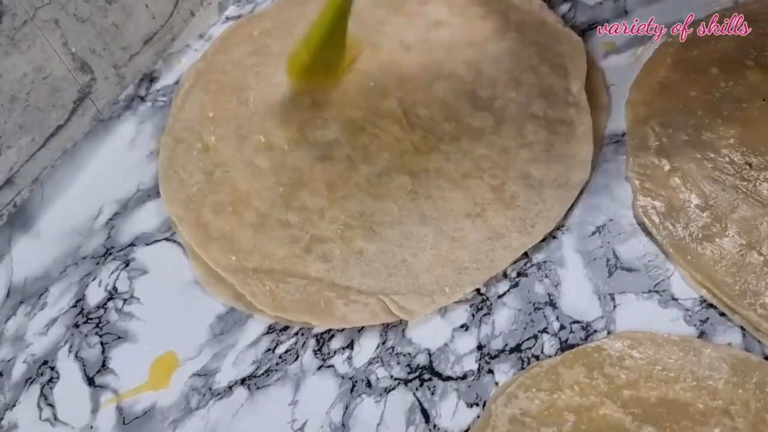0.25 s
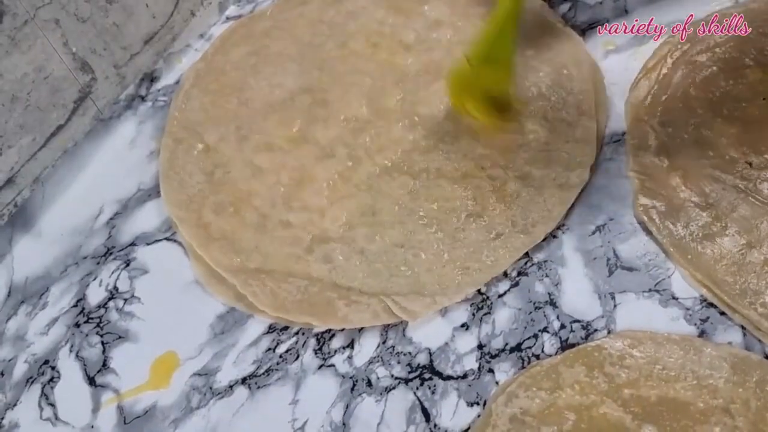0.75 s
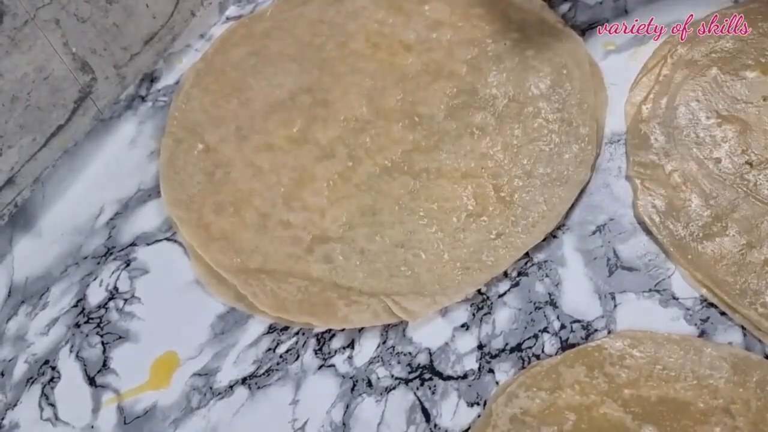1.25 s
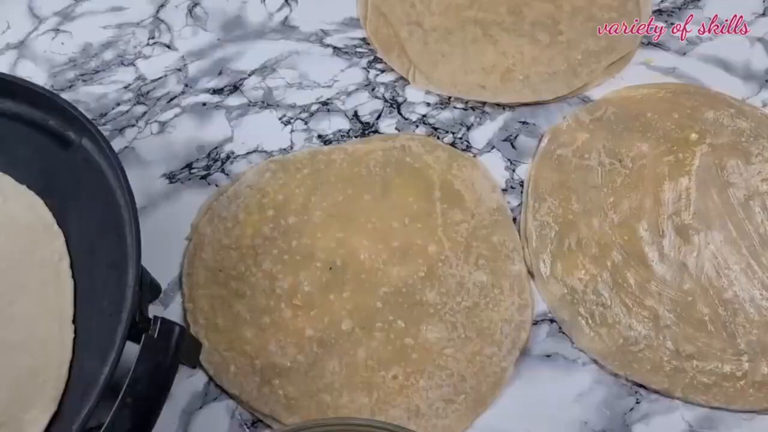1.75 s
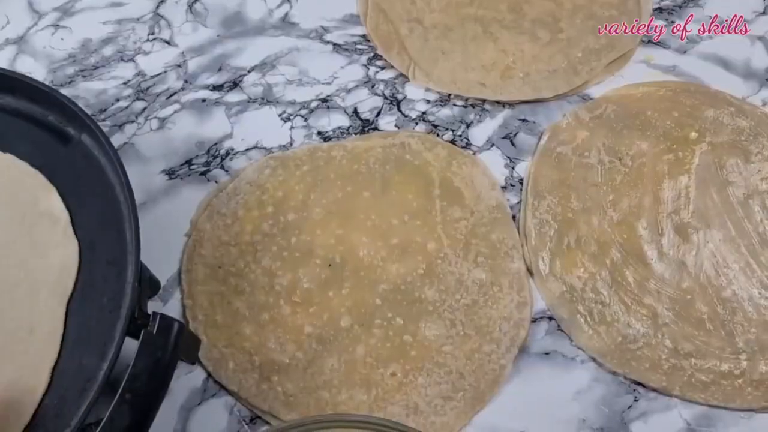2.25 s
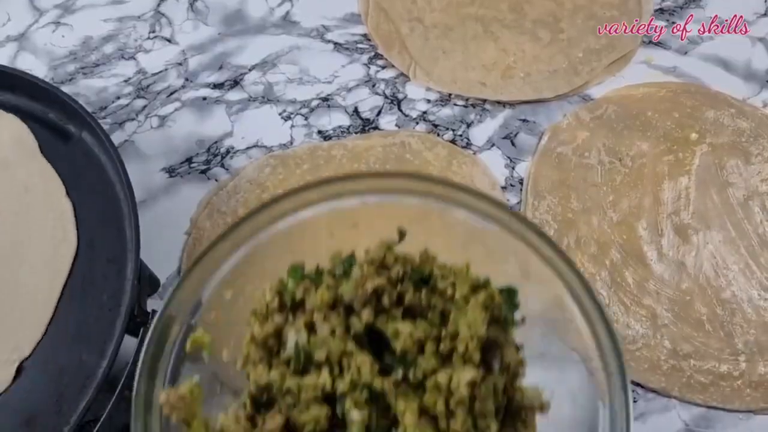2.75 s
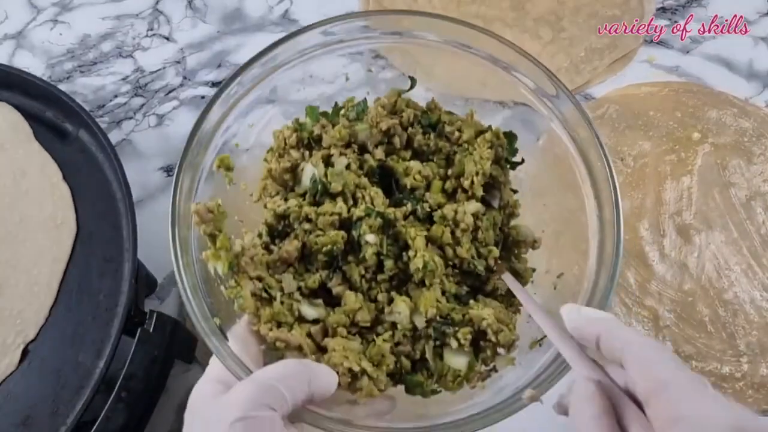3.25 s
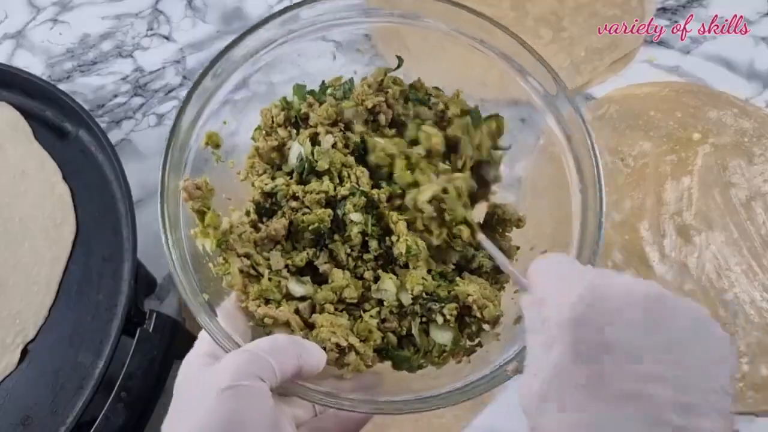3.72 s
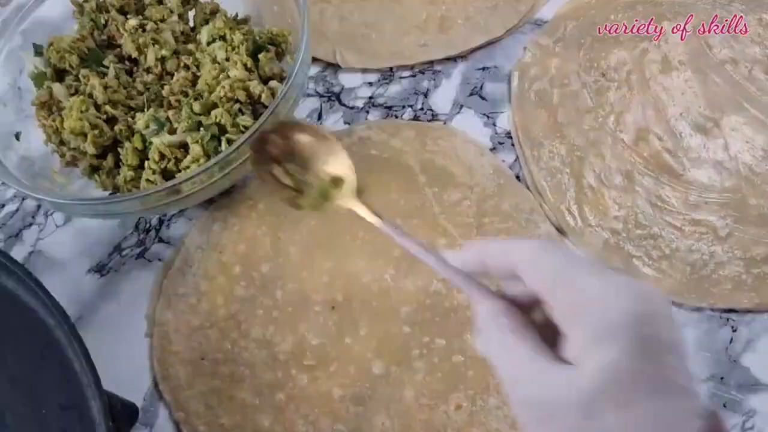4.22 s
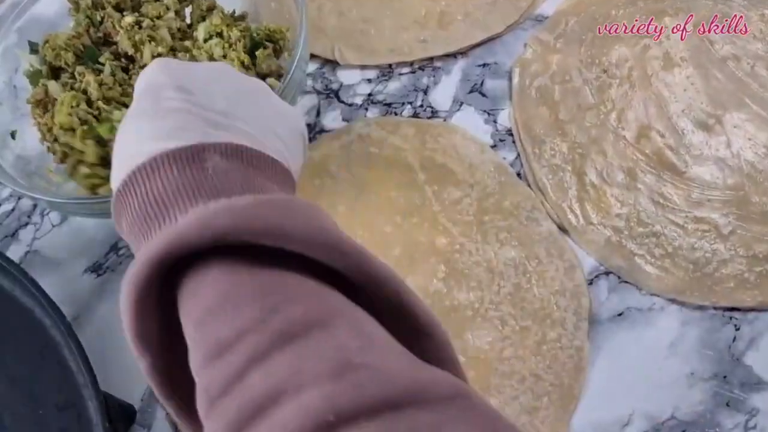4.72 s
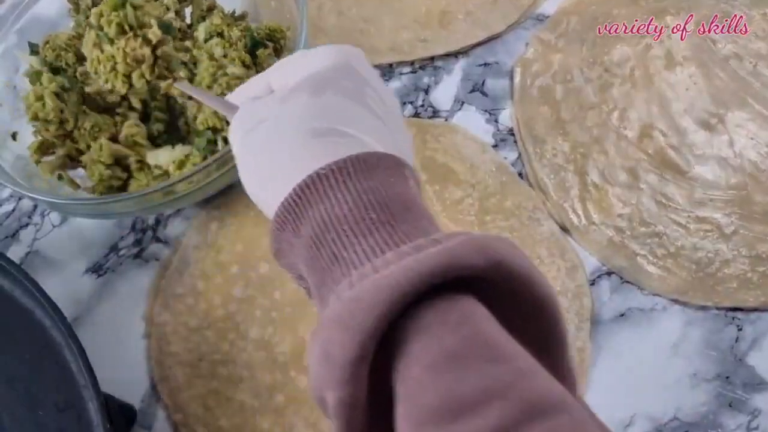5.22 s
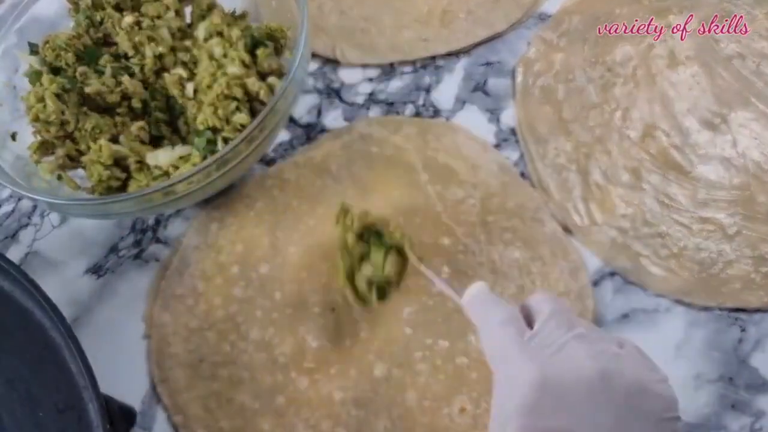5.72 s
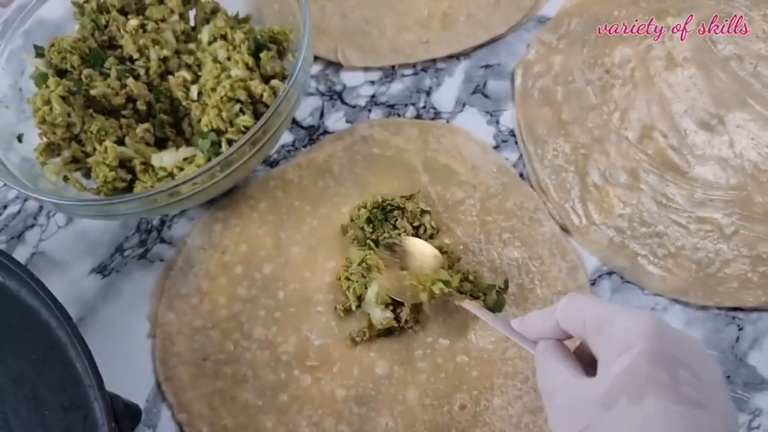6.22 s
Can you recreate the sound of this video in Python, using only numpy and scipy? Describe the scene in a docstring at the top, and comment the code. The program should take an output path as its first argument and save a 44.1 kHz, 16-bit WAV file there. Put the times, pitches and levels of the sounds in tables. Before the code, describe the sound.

In a small kitchen, a brush swishes, glass cracks against a worktop, a bowl is set down, and a spoon clanks and scrapes.

```python
"""A small hard kitchen heard close by two spaced microphones, with a faint hum and hiss behind everything.
First a soft brush oils dough, as friction hiss over a low murmur; then a small glass dish clinks on a stone
worktop, a crack and dying modes that break off at once. A bowl slides over and is set down with dull knocks.
A spoon taps it, faint crumbs tick, and the spoon clanks and scrapes, its grit ringing the damped bowl.
Hands and sleeves rustle throughout, as quiet friction hiss."""
import sys
import numpy as np
from scipy import signal
from scipy.fft import rfft, irfft
from scipy.io import wavfile
from scipy.ndimage import uniform_filter1d

SR = 44100
rng = np.random.default_rng(int(sys.argv[2]) if len(sys.argv) > 2 else 0)


def generate_wav(signal):
    """Clip the signal to [-1, 1] and save it as 16-bit WAV at the path in sys.argv[1]."""
    frames = np.transpose(np.atleast_2d(signal))
    scaled = np.clip(frames, -1, 1) * 32767
    pcm = np.round(scaled).astype(np.int16)
    wavfile.write(sys.argv[1], SR, pcm)


N = 285327

# Colour of the room's hiss. Each row: frequency in Hz, relative level in dB per Hz.
AIR_COLOUR = [(110, -38), (190, -11.5), (224, -11), (306, 0), (583, -9), (1820, -14.5), (7110, -23.5),
              (10700, -35.5), (15400, -19.5)]
AIR_DB = -66.5  # rms level of the hiss
# Low rumble of the room. Each row: centre in Hz, width in Hz, relative level in dB.
RUMBLE_BANDS = [(59.8, 22, -72), (118, 40, -67.5), (425.5, 810, -72)]
# Swell of the rumble. Each row: time in seconds, level in dB.
RUMBLE_SWELL = [(0, -66), (.7, -62), (1.5, -58.5), (1.899, -66), (3.3, -68.5), (4.2, -66), (5.2, -59.5),
                (6.47, -67)]
# Appliance tones. Each row: frequency in Hz, peak in dB, rms waver in Hz.
MOTOR_TONES = [(95, -66, 7), (158.4, -67.5, 0.35)]
# Likeness of the two microphones in diffuse sound. Each row: frequency in Hz, correlation from -1 to 1.
MIC_LIKENESS = [(60, 0.68), (190, 0.78), (350, -0.044), (600, -0.25), (1400, -0.48), (3000, -0.022)]
# Echo of the room. Each row: frequency in Hz, time to fall 60 dB in seconds.
KITCHEN_DECAY = [(100, 0.14), (500, 0.34), (2000, 0.28), (6000, 0.26), (14000, 0.23)]
EDGE_HZ = 15700  # upper band limit of the microphones

# Rubbing strokes. Each row: full strength at seconds, held for seconds, level in dB, treble added in dB.
BRUSH_STROKES = [(0, 0.039, -46, 3), (0.163, 0.017, -47.5, 2), (.245, 0.01, -38.5, 2),
                 (0.347, 0.019, -40, 1), (.51, 0.075, -51.5, 0), (0.618, .08, -45, 1)]
BOWL_SLIDES = [(1.91, 0.31, -47, 0.0045), (2.39, 0.22, -55.5, 0.0033)]
SPOON_SCRAPES = [(4.515, 0.12, -48, 5), (5.08, 0.17, -43, 0), (5.28, 0.26, -57, 8),
                 (5.99, 0.016, -59.5, 10), (6.412, .07, -54.5, 0)]
# Speed of each kind of stroke: rise, sag while held and release, all in dB per second.
BRUSH_MOVE = (320, 7.9, 280)
SLIDE_MOVE = (130, 16.4, 110)
SCRAPE_MOVE = (2600, 5.1, 184)
# Rustle of hands and sleeves. Each row: time in seconds, level in dB.
RUSTLE_LEVEL = [(0, -63.5), (.8, -69.5), (1.0, -61), (1.62, -65), (1.83, -77.5), (2.95, -69.5), (3.44, -73),
                (3.5, -63), (3.65, -66.5), (3.79, -67), (4.03, -70.5), (4.15, -60.5), (4.28, -69),
                (4.36, -60.5), (4.5, -67.5), (5.63, -66), (6.05, -68), (6.17, -88), (6.3, -69.5)]
# Colour of each rubbing. Each row: frequency in Hz, relative level in dB per Hz.
BRUSH_COLOUR = [(120, -49), (400, -19), (955, -17.5), (1710, -3.5), (2500, -6.5), (15400, -17)]
SLIDE_COLOUR = [(710, -46), (1200, -14.5), (1470, -10.5), (1710, -6), (1820, -9.5), (4010, -1.5),
                (15400, -12.5)]
SCRAPE_COLOUR = [(60, -34), (100, -11), (300, -12.5), (460, -12), (800, -16.5), (2600, -19.5), (7000, -25),
                 (10000, -37.5), (13000, -28.5), (15400, -34.5)]
RUSTLE_COLOUR = [(290, -25.5), (500, 1.5), (769, -5), (1440, -7), (1900, -7), (2920, -13), (15400, -21.5)]
# Tones murmuring under the brushed dough. Each row: frequency in Hz, relative level in dB, 60 dB decay in s.
DOUGH_MODES = [(127.4, 1, .2), (264, -9, 0.11), (509.6, -5.5, 0.13)]
MURMUR_DB = -12.5  # against the stroke
GRIT_DB, GRITS_PER_S = -13, 320  # level against the scraping stroke, mean rate of grains

# Dull knocks into the worktop. Each row: start in seconds, peak in dB, centre in Hz, spread in octaves.
KNOCKS = [(0.744, -37.5, 463, 1.25), (1.393, -51.5, 178, 0.65), (1.631, -23, 155, 0.68),
          (1.632, -15.5, 770, 0.76), (1.682, -18, 834, 1.3), (1.829, -46.5, 94, 0.59),
          (2.092, -48.5, 226, 1.47), (2.871, -49.5, 71, 0.69), (2.971, -29.5, 98, 1.6),
          (2.997, -32, 94.3, 1.24), (3.089, -42, 131.4, 0.92), (4.179, -46.5, 423, 0.26),
          (4.575, -25.5, 327, 0.77), (4.669, -31, 133, 1.6), (4.75, -33.5, 123, 0.57),
          (4.776, -28.5, 354.2, 0.35), (5.144, -32, 274.1, 0.97), (5.216, -23, 262, 0.94),
          (5.242, -24, 251, 1.76), (5.269, -42, 129, 1.5), (5.632, -28, 114.4, 0.82),
          (5.672, -32.5, 91.5, 1.1)]
# Modes of the worktop. Each row: frequency in Hz, relative level in dB, 60 dB decay in seconds.
WORKTOP_MODES = [(71, 6, 0.086), (93, 5.5, 0.21), (129, 3.5, 0.27), (180, -2, 0.17), (238.5, 1.5, .1),
                 (302, 2.5, 0.091), (425, 0.5, 0.12), (474, -3.5, 0.22), (512.5, 2, .12),
                 (600.7, -3.5, 0.078), (763.2, -1, 0.17), (823, 1, 0.18), (849.5, -1.5, 0.098),
                 (1005, -6, 0.19)]
# Small ticks of crumbs, bristles and spoon. Each row: time in seconds, peak in dB, centre in Hz, width in octaves.
TICKS = [(0.4995, -38.5, 1470, 0.4), (1.001, -33, 13900, 0.38), (1.0055, -31.5, 9000, 2.1),
         (1.066, -35.5, 3400, 0.18), (1.4117, -48.5, 7670, 1.8), (3.4999, -37, 1760, 1.16),
         (3.5175, -40.5, 1520, 1.6), (3.579, -44.5, 3750, 1.2), (3.6954, -42.5, 2300, 2.8),
         (3.8065, -28.5, 3640, 0.48), (3.808, -43, 990, 0.93), (4.114, -48, 11410, 1.4),
         (4.1443, -57, 12200, 1.9), (4.2552, -54, 8600, 0.99), (4.3291, -50.5, 6680, 1.16),
         (4.9096, -49, 5000, 1.5), (5.219, -25, 846, 0.57), (5.6346, -41.5, 1428, 0.54),
         (5.9835, -37.5, 1700, 0.95), (5.9933, -42, 12400, 1.44), (6.054, -53, 1740, 0.46),
         (6.103, -52, 10600, 1.02), (6.2458, -51.5, 4400, 0.68), (6.3207, -47.5, 12800, 2.3)]
# While the spoon digs, crumbs tick at chance moments: from seconds, to seconds.
STIRRING = (3.45, 4.45)
CRUMB_DB, CRUMB_SPREAD_DB = -54, 3  # mean peak, and the most it strays either way

# Blows on glass. Each row: time in seconds, crack peak in dB, tilt in dB per octave, ring against crack in dB,
# left minus right in dB, dB added to one clear mode.
DISH_BLOWS = [(1.6288, -7, 2.4, 3.5, -1.5, 0), (1.6825, -14.5, -4, -8.5, 8, -28)]
SPOON_TAPS = [(3.1406, -16, 0.45, -22, 0.46, 2.5), (3.2886, -41.5, -2.1, -11.5, -1.1, 3.5),
              (3.3512, -34, -1.5, -15, -0.35, 8), (4.7495, -14, 0.31, -16, 1.23, -9.5)]
RIM_BLOWS = [(4.5758, -12.5, 0, -13, 1.6, 0), (4.5952, -30.5, 0, -6, 0.67, 0)]
# Colour of the crack. Each row: frequency in Hz, relative level in dB per Hz.
CRACK_COLOUR = [(200, -26.5), (500, -9), (1500, -4), (3800, -4.5), (6500, -5.5), (10000, -19), (15500, -30)]
# Mode frequencies of each glass body, in Hz.
DISH_HZ = [132, 1862, 2729, 4011, 4039, 4924, 4981, 6971, 8554, 9249, 10770, 12650, 13810]
BOWL_HZ = [590, 1230, 1400, 2261, 3058, 3451, 3494, 3903, 4867, 6438, 7208, 8070, 11890, 13930]
RIM_HZ = [1330, 1916, 2885, 3844, 4450, 4560, 4936, 5862, 7074, 8500, 9502, 11200, 13500]
# The same modes in order. Each row: relative level in dB, 60 dB decay in seconds.
DISH_MODES = [(-20, 0.18), (-6.5, 0.3), (-21, .3), (-18, 0.11), (-9, 0.21), (-13, 0.097), (-14.5, .12),
              (-27, 0.21), (-34.5, 0.062), (-37.5, 0.14), (-31, 0.11), (-38, .1), (-34, 0.046)]
BOWL_MODES = [(-1, 0.048), (-7, 0.081), (3, 0.027), (-7.5, 0.19), (4.5, 0.037), (2.5, 0.26), (0, 0.076),
              (-14, 0.054), (-1.5, 0.093), (-4.5, 0.093), (-1, 0.067), (-17, 0.13), (-17, 0.22),
              (-11, 0.048)]
RIM_MODES = [(8.5, 0.012), (-2, 0.079), (-10, 0.061), (-4, 0.057), (-7.5, 0.31), (-2, 0.12), (0.5, 0.049),
             (11, 0.017), (-24, 0.031), (-12, 0.1), (-9.5, 0.065), (-4.5, 0.021), (-11, 0.044)]
DISH_STOPS_S = 1.829  # the dish's ring and its echo break off


def gain_of(db):
    """Decibels to a factor."""
    return 10 ** (np.asarray(db) / 20)


def evened(x):
    """Scales to rms 1."""
    return x / np.sqrt(np.mean(x ** 2) + 1e-20)


def read(points, hz):
    """Reads a (Hz, value) table on a log frequency axis."""
    f, value = np.transpose(points)
    return np.interp(np.log(hz + 1), np.log(f + 1), value)


def add(mix, s, sound):
    """Mixes a two-channel sound in at s seconds."""
    part = mix[:, round(s * SR):][:, :sound.shape[1]]
    part += sound[:, :part.shape[1]]


def pan(db):
    """Gains of the two channels for a left-right difference."""
    return gain_of([[db / 2], [-db / 2]])


def alike(left, other, hz):
    """Left and right spectra, correlated at each frequency as far as the spaced microphones agree."""
    same = np.clip(read(MIC_LIKENESS, hz), -1, 1)
    return np.array([left, same * left + np.sqrt(1 - same ** 2) * other])


def noise(field, size, patchy_db):
    """Stereo noise whose short-time magnitude is field(hz, t), with drifting patches."""
    hz = np.fft.rfftfreq(size, 1 / SR)[:, None]
    t = np.arange(4 * N // size + 5) * size / 4 / SR
    a, b, c, d, patches = rng.standard_normal((len(t), len(hz), 5)).T
    patches = uniform_filter1d(patches, size // 64, 0)
    patches = evened(uniform_filter1d(patches, 8192 // size, 1))
    z = alike(a + 1j * b, c + 1j * d, hz) * field(hz, t) * gain_of(patchy_db * patches)
    return signal.istft(z, nperseg=size, noverlap=3 * size // 4)[1][:, :N]


def ring(hz, modes, extra_db, lag_ms, blur):
    """Dying sines, later at the right microphone by lag_ms; each mode is three close ones, blur apart, that beat."""
    t, out = np.arange(SR // 3) / SR, 0
    for f, (db, t60), more_db in zip(hz, modes, extra_db):
        detunings = blur * rng.uniform(-1, 1, 3)
        close = sum(np.sin(2 * np.pi * f * (1 + off) * t) for off in detunings) / 3
        out = out + gain_of(db + more_db - 60 * t / t60) * close
    lag = round(lag_ms * SR / 1000)
    early, late = max(-lag, 0), max(lag, 0)
    out = out * (1 - np.exp(-t / 0.00043))  # the ring takes a moment to spread through the body
    return np.array([np.pad(out, (early, late)), np.pad(out, (late, early))])


def driven(push, body):
    """A body kept ringing by a continuous push."""
    return signal.oaconvolve(push[None], body / np.linalg.norm(body[0]), axes=1)[:, :N]


def burst(colour_db, ms):
    """A few milliseconds of dying noise with the colour colour_db(hz), peak 1."""
    t = np.arange(4096) / SR
    after = t - .002  # the burst is strongest 2 ms in
    envelope = np.exp(-np.abs(after) / np.where(after < 0, .0003, ms / 1000))
    one, other = rng.standard_normal((2, len(t))) * envelope
    right = 0.51 * np.roll(one, rng.integers(-20, 20)) + 1.2 * other
    z = rfft(np.array([one, right]))
    sound = irfft(z * gain_of(colour_db(np.fft.rfftfreq(len(t), 1 / SR) + 1)))
    return sound / np.abs(sound).max()


def kitchen(x, wet_db):
    """Adds the echo: sparse taps of random sign, each band dying at its own speed, other taps per microphone."""
    taps = np.zeros((2, SR // 2))
    at = np.arange(120, SR // 2 - 20, 20) + rng.integers(0, 20, (2, (SR // 2 - 121) // 20))
    np.put_along_axis(taps, at, rng.choice([-1., 1.], at.shape), 1)
    hz, t, z = signal.stft(taps, SR, nperseg=512)
    decay = gain_of(-60 * t / read(KITCHEN_DECAY, hz)[:, None])
    tail = signal.istft(alike(*z, hz[:, None]) * decay, SR, nperseg=512)[1]
    echo = signal.oaconvolve(x, tail / np.linalg.norm(tail[0]), axes=1)[:, :N]
    return x + gain_of(wet_db) * echo


def air():
    """Steady hiss of the room, with a low rumble in broad resonances that swells and fades."""
    def rumble(hz, t):
        bands = sum(gain_of(db) / np.sqrt(width) / (1 + ((hz - f) / width) ** 2)
                    for f, width, db in RUMBLE_BANDS)
        return bands + 0 * t

    hiss = noise(lambda hz, t: gain_of(read(AIR_COLOUR, hz)) + 0 * t, size=2048, patchy_db=-2.7)
    drone = noise(rumble, size=4096, patchy_db=-4.1)
    swell = gain_of(np.interp(np.arange(N) / SR, *np.transpose(RUMBLE_SWELL)))
    return gain_of(AIR_DB) * evened(hiss) + swell * evened(drone)


def motor():
    """Steady low tones of an appliance, their pitch wavering a little."""
    waver = uniform_filter1d(rng.standard_normal((len(MOTOR_TONES), N)), size=4000)
    out = 0
    for (hz, db, by_hz), w in zip(MOTOR_TONES, waver):
        phase = 2 * np.pi * np.cumsum(hz + by_hz * evened(w)) / SR
        out = out + gain_of(db) * np.sin(phase)
    return out


def held(s, hold_s, db, move, t):
    """Level in dB of one stroke: it rises, is held while it sags, and is let go."""
    rise, sag, release = np.abs(move)
    before, after = np.maximum(s - t, 0), np.maximum(t - s - hold_s, 0)
    return db - rise * before - sag * np.clip(t - s, 0, hold_s) - release * after


def stroke(level_db, treble_db, colour, hz):
    """Short-time power of friction: a level over time, and a colour tipped toward the treble above 5 kHz."""
    treble = np.clip(np.log2((hz + 1) / 5000), 0, 1) * treble_db
    shape = gain_of(read(colour, hz) + treble) ** 2
    shape = shape / np.sum(shape * (hz > 1500), axis=0)  # the level counts what lies above 1500 Hz
    return shape * gain_of(level_db) ** 2


def friction(hz, t):
    """Short-time magnitude of all strokes and the rustle, their powers summed."""
    sources = [(BRUSH_STROKES, BRUSH_MOVE, BRUSH_COLOUR), (BOWL_SLIDES, SLIDE_MOVE, SLIDE_COLOUR),
               (SPOON_SCRAPES, SCRAPE_MOVE, SCRAPE_COLOUR)]
    power = stroke(np.interp(t, *np.transpose(RUSTLE_LEVEL)), 0, RUSTLE_COLOUR, hz)
    for rows, move, colour in sources:
        for s, hold_s, db, treble_db in rows:
            power = power + stroke(held(s, hold_s, db, move, t), treble_db, colour, hz)
    return np.sqrt(power)


def rubbing():
    """Brush, sliding bowl, scraping spoon and rustling hands: friction hiss with a grainy flutter."""
    hiss = noise(friction, size=256, patchy_db=2.1)
    grain = evened(uniform_filter1d(rng.standard_normal(N), size=150))
    # from the first spoon tap on, crumbs break in the filling: sparse snaps, a few of them large
    sizes = gain_of(2.6 * np.minimum(rng.exponential(1, N), 4))
    snaps = sizes * (rng.random(N) < 120 / SR)  # about 120 a second
    snaps = signal.lfilter([1], [1, -np.exp(-1 / (0.0003 * SR))], snaps)
    snaps = snaps * (np.arange(N) / SR > SPOON_TAPS[0][0])
    return gain_of(0.83 * grain) * (1 + .5 * snaps) * hiss


def dough_murmur():
    """The brush drags on the dough and sets a few low tones murmuring beneath it."""
    t, rows = np.arange(N) / SR, np.array(DOUGH_MODES)
    drag = sum(gain_of(held(s, hold_s, db, BRUSH_MOVE, t)) for s, hold_s, db, _ in BRUSH_STROKES)
    push = drag * rng.standard_normal(N)
    body = ring(rows[:, 0], rows[:, 1:], np.zeros(len(rows)), lag_ms=.25, blur=0.0081)
    return gain_of(MURMUR_DB) * driven(push, body)


def grit():
    """Grains caught under the scraping spoon ring the bowl, damped by the filling."""
    t = np.arange(N) / SR
    damped = np.array(BOWL_MODES) * [1, .22]  # the filling shortens every decay
    sizes = gain_of(3.4 * np.minimum(rng.exponential(1, N), 4))
    grains = evened(sizes * (rng.random(N) < GRITS_PER_S / SR))
    scrape = sum(gain_of(held(s, hold_s, db, SCRAPE_MOVE, t)) for s, hold_s, db, _ in SPOON_SCRAPES)
    darker_db = -2.5 * np.log2(np.array(BOWL_HZ) / 2000)
    body = ring(BOWL_HZ, damped, darker_db, lag_ms=-.1, blur=0.084)
    return gain_of(GRIT_DB) * driven(scrape * grains, body)


def crumbs(count=26):
    """Rows of faint ticks at chance moments, in chance colours."""
    when, size, colour = rng.random((count, 3)).T
    s = STIRRING[0] + when * np.ptp(STIRRING)
    db = CRUMB_DB + CRUMB_SPREAD_DB * (2 * size - 1)
    return [(*row, 1.1) for row in zip(s, db, 2500 * 5 ** colour)]


def ticks():
    """Short noise snaps, each with one broad colour, a little left or right."""
    out = np.zeros((2, N))
    for s, db, centre_hz, octaves in TICKS + crumbs():
        snap = burst(lambda hz: -6 * np.minimum((np.log2(hz / centre_hz) / octaves) ** 2, 12), ms=4.7)
        add(out, s - .002, gain_of(db) * pan(rng.normal(0, 3)) * snap)
    return out


def knocks(rows):
    """A blunt push rings the worktop modes that lie near its centre; low knocks start more softly."""
    out, modes = np.zeros((2, N)), np.array(WORKTOP_MODES)
    hz = modes[:, 0]
    for s, db, centre_hz, octaves in rows:
        nearness_db = -6 * (np.log2(hz / centre_hz) / octaves) ** 2
        tone = ring(hz, modes[:, 1:], nearness_db, lag_ms=.25, blur=0.041)
        tone = tone * (1 - np.exp(-np.arange(tone.shape[1]) / SR * centre_hz / 0.44))
        add(out, s, gain_of(db) * tone / np.abs(tone).max())
    return out


def glass(blows, hz, modes, crack_ms, lag_ms, blur, order):
    """Each blow is a crack and the ring of the glass, both tilted in colour; order picks its clear mode."""
    out = np.zeros((2, N))
    for s, db, tilt_db, ring_db, pan_db, clear_db in blows:
        crack = burst(lambda f: read(CRACK_COLOUR, f) + tilt_db * np.log2(f / 3500), crack_ms)
        clearest = np.arange(len(hz)) == order  # fed more or less by where the blow lands
        extra_db = ring_db + tilt_db * np.log2(np.array(hz) / 3500) + clear_db * clearest
        tone = ring(hz, modes, extra_db, lag_ms, blur)
        gains = gain_of(db) * pan(pan_db)
        add(out, s - .001, gains * crack)
        add(out, s + .001, gains * tone)
    return out


def scene():
    """All sources in the kitchen; the dish, its knocks and their echo break off at once."""
    with_dish = np.array([1.6 < row[0] < DISH_STOPS_S for row in KNOCKS])
    dish = glass(DISH_BLOWS, DISH_HZ, DISH_MODES, crack_ms=1.9, lag_ms=.7, blur=0.0011, order=1)
    dish = dish + knocks(np.compress(with_dish, KNOCKS, axis=0))
    cut = np.clip((DISH_STOPS_S - np.arange(N) / SR) / 0.0014, 0, 1)
    dish = kitchen(dish, -2) * cut
    taps = glass(SPOON_TAPS, BOWL_HZ, BOWL_MODES, crack_ms=2.13, lag_ms=-0.098, blur=0.0037, order=5)
    clank = glass(RIM_BLOWS, RIM_HZ, RIM_MODES, crack_ms=1.3, lag_ms=0.254, blur=0.0195, order=7)
    bowl = kitchen(taps + clank + ticks(), -5.5)
    thuds = kitchen(knocks(np.compress(~with_dish, KNOCKS, axis=0)), -4.0)
    return air() + motor() + rubbing() + dough_murmur() + grit() + thuds + bowl + dish


def record(dry):
    """The microphones lose the deepest bass; then the band limit."""
    thin = signal.sosfilt(signal.butter(2, 45, "high", fs=SR, output="sos"), dry)
    band = signal.firwin(511, EDGE_HZ, window=("kaiser", 12), fs=SR)
    return signal.oaconvolve(thin, band[None], "same")


dry = scene()
out = record(dry)
generate_wav(out)
```